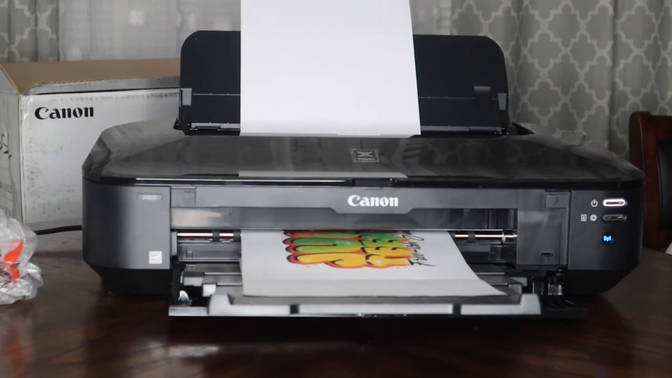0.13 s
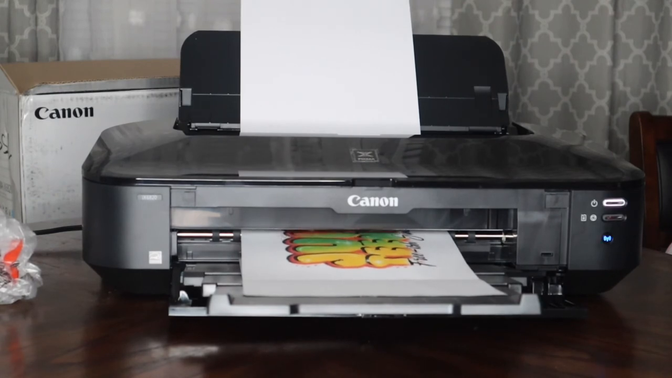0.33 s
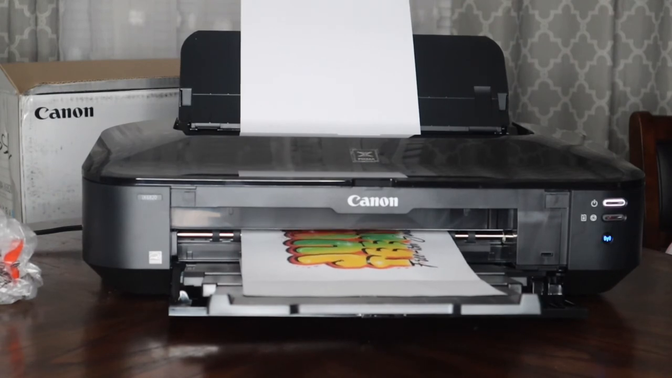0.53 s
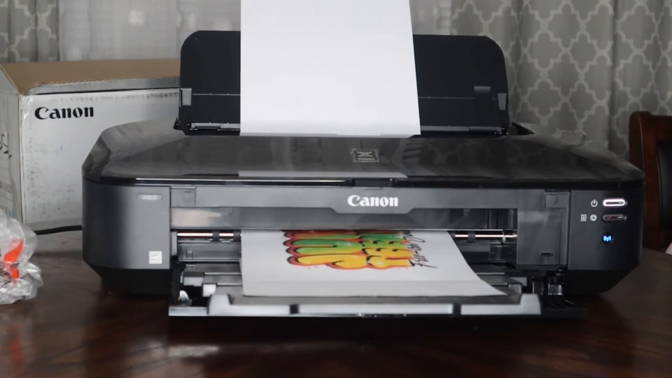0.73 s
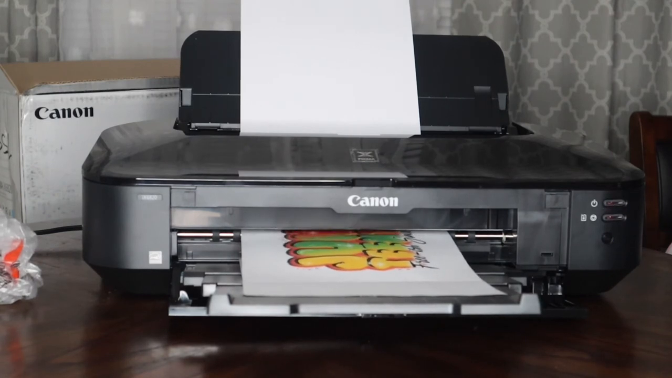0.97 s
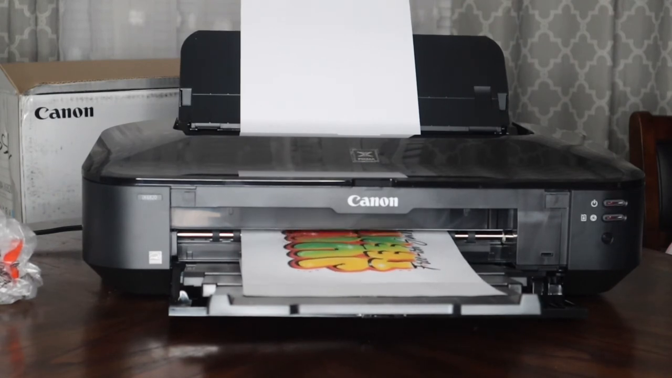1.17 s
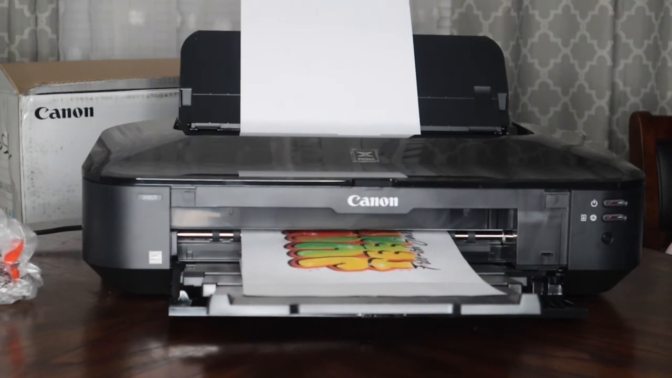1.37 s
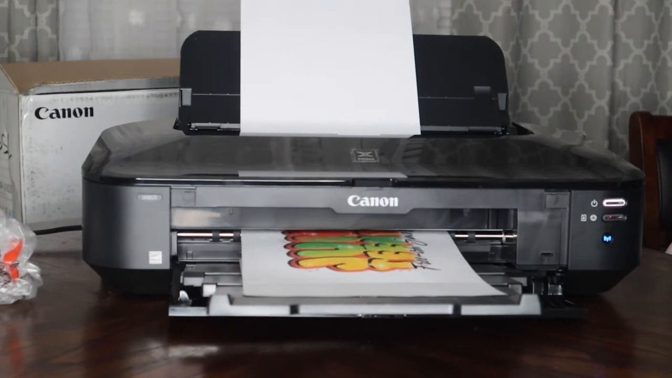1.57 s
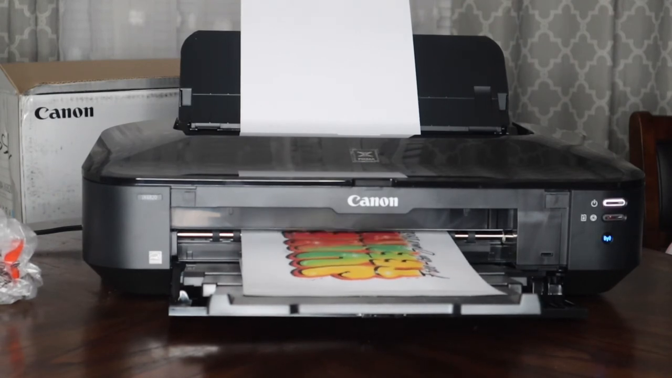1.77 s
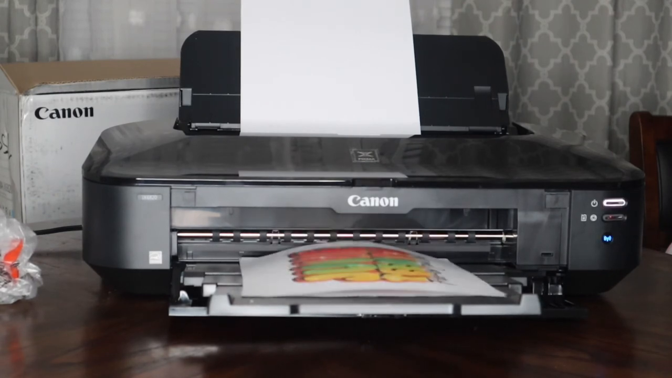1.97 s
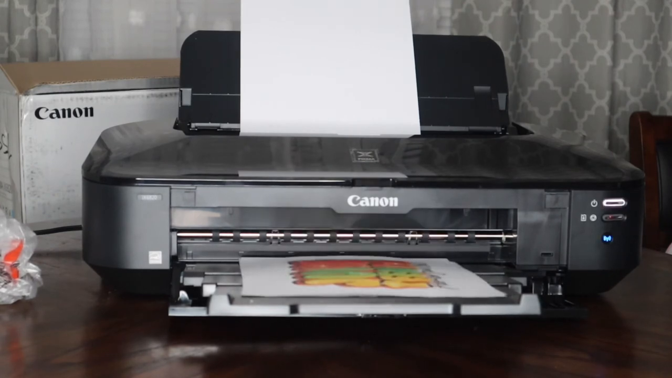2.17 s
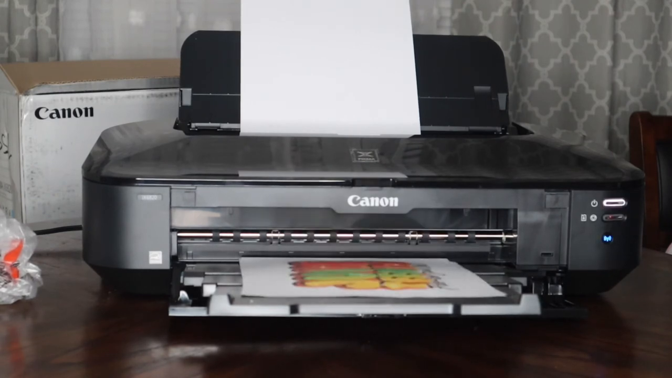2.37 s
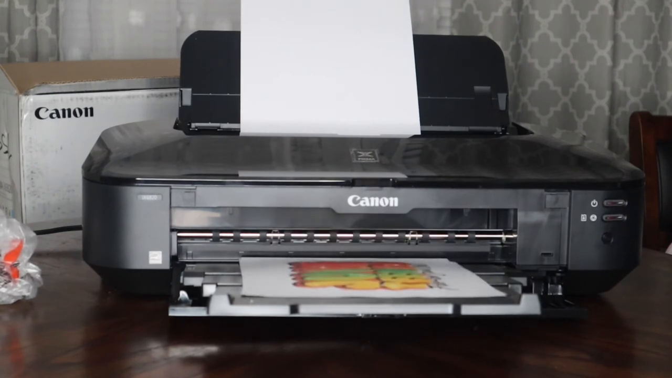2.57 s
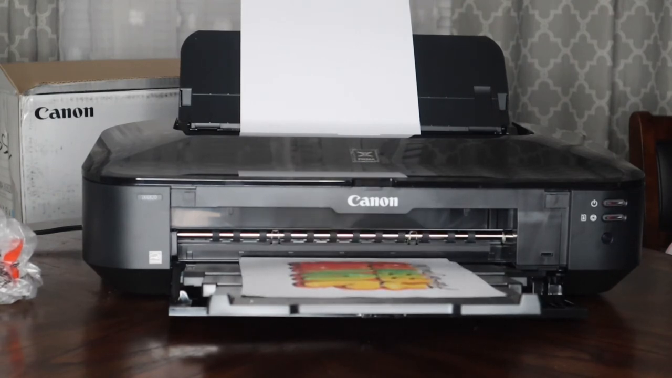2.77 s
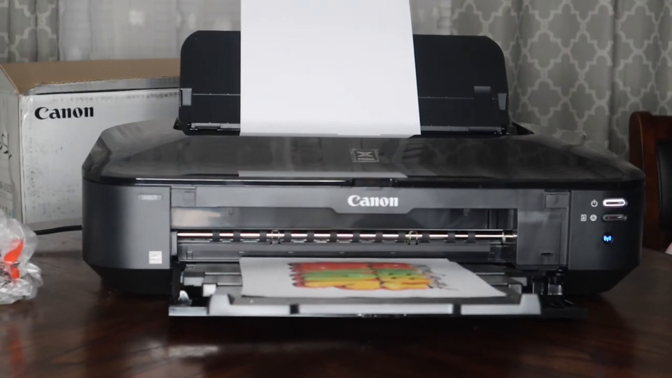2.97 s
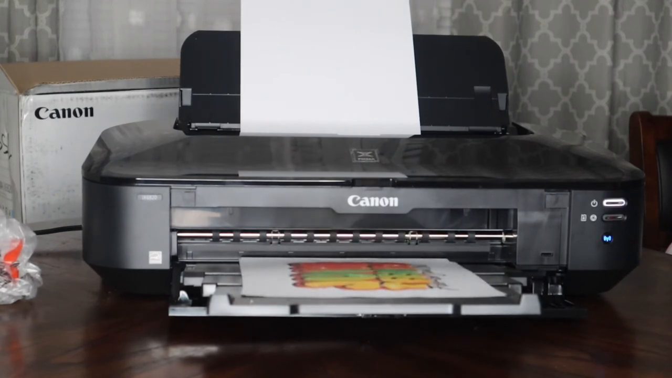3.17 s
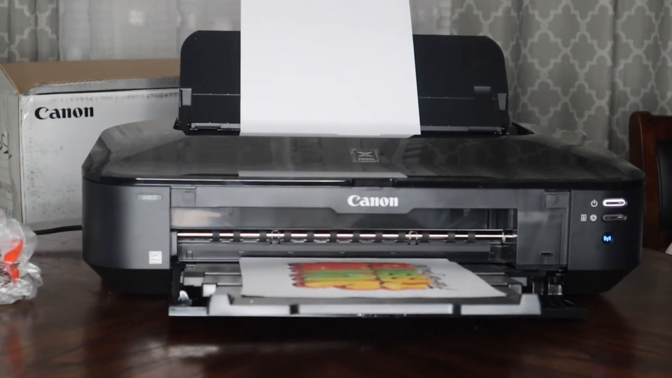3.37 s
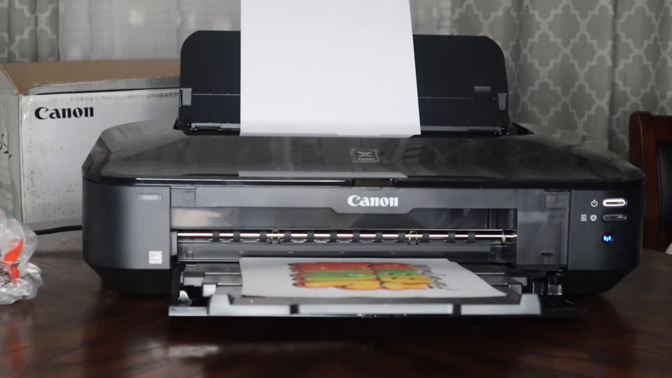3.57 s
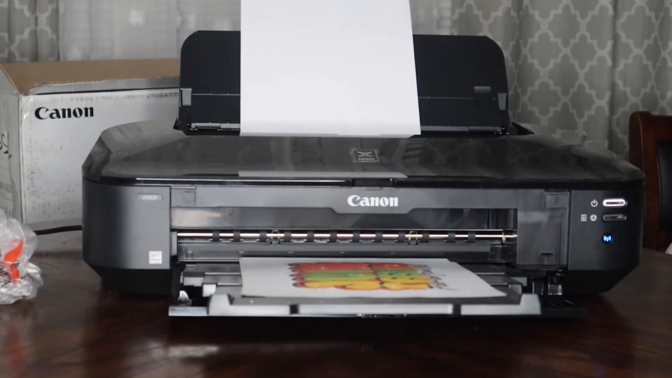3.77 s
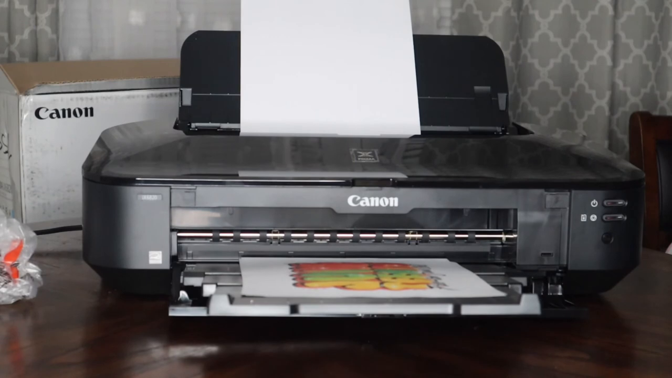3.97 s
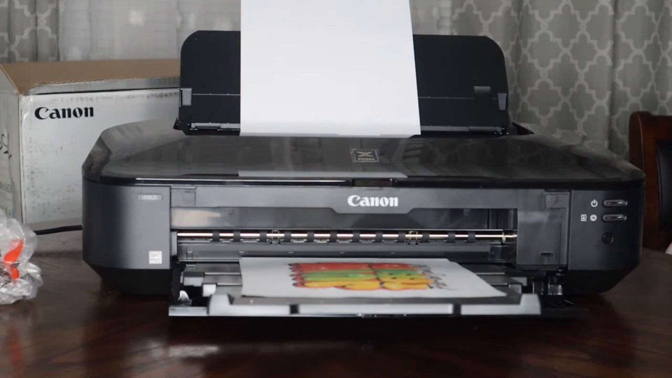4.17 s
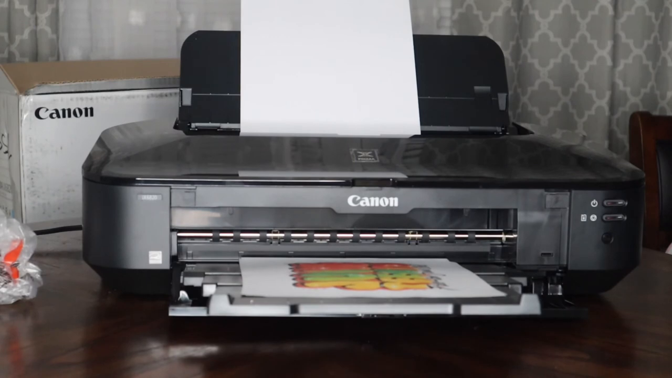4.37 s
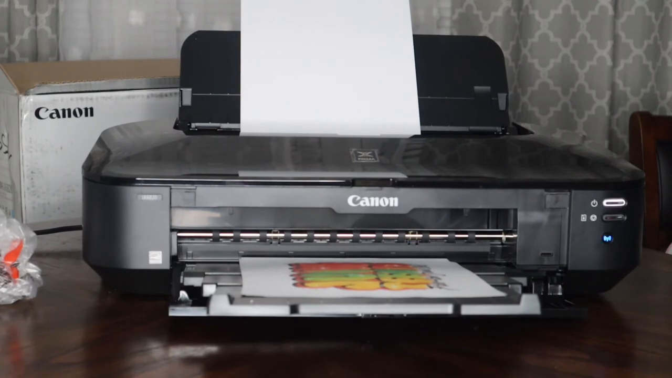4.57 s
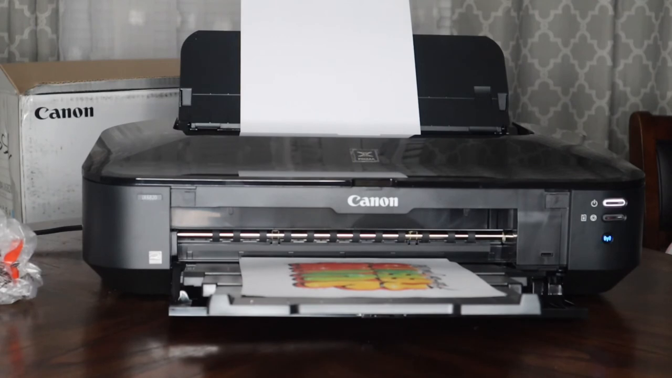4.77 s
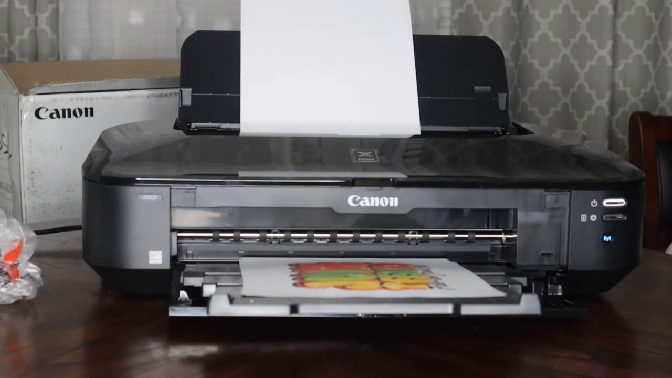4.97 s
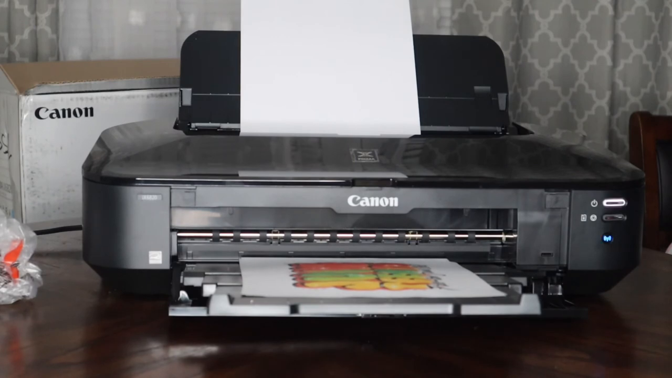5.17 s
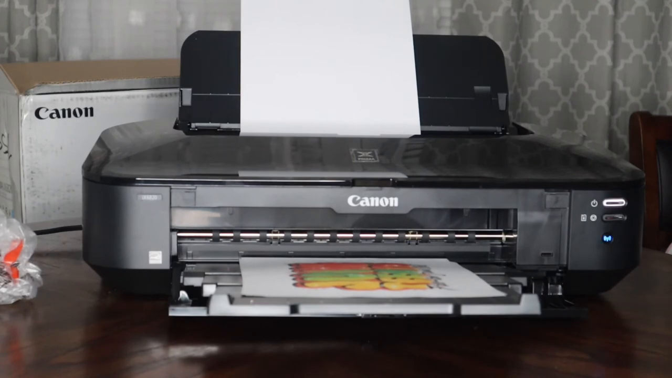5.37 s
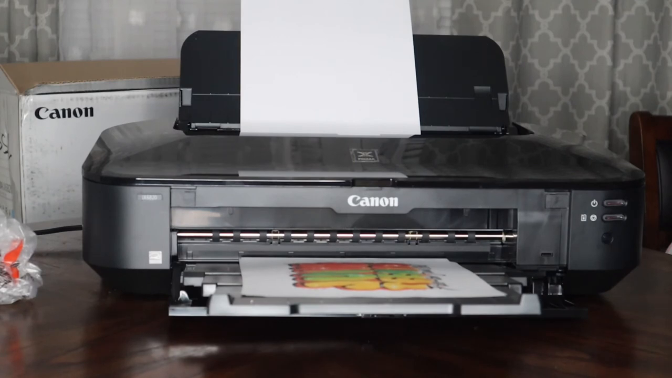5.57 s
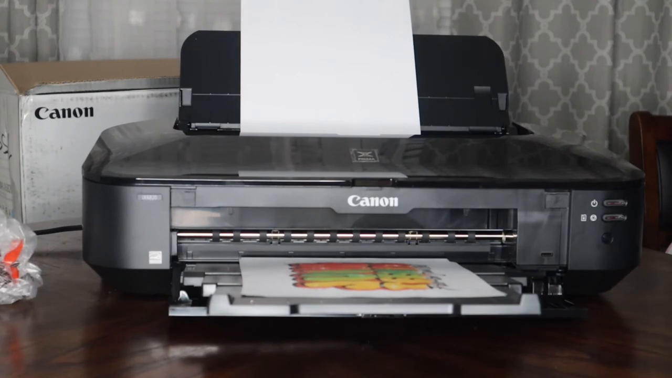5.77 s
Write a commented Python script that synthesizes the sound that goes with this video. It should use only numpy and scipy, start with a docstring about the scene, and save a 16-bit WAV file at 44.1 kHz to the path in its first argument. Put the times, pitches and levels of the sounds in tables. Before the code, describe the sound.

An inkjet printer shuttles its head with whirs and squeaks, races its gears to eject a sheet, slams loudly, then clicks into rest.

```python
"""An inkjet printer on a wooden table finishes a page in a small room.
The head shuttles (rail friction, belt drone, motor whine) while rollers nudge the paper on; some parts squeak.
Feed gears then race to throw out the sheet (mesh tones, tooth rattle, hiss), and the mechanism shifts with a clack.
A cam drive hums, flicks levers and trips its latch three times; the rollers spin once more.
A parking drive purrs and bumps; last, the head clicks into its rest. Blows are short noise bursts and ringing modes."""
import sys
import numpy as np
from scipy import signal
from scipy.fft import rfft, irfft, next_fast_len
from scipy.io import wavfile

SR = 44100
rng = np.random.default_rng(int(sys.argv[2]) if len(sys.argv) > 2 else 0)


def int16_out(signal):
    """Quantize to a 16-bit WAV file."""
    q = np.round(np.clip(np.atleast_2d(signal).T, -1, 1) * 32767)
    wavfile.write(sys.argv[1], SR, q.astype(np.int16))


N = 256220
TIME = np.arange(N) / SR


def from_db(db):
    """Decibels to gain."""
    return 10 ** (np.asarray(db) / 20)


def rms_one(x):
    """Scale to rms 1."""
    return x / np.sqrt(np.mean(x ** 2) + 1e-20)


def at_hz(points, hz):
    """Read a table on a log-frequency axis."""
    table_hz, value = np.transpose(points)
    return np.interp(np.log(hz + 1e-3), np.log(table_hz), value)


def peaks_db(peaks, hz):
    """Lift (or dip, if negative) of a set of resonances at these frequencies."""
    return sum(db / (1 + (2 * (hz - centre) / width) ** 2) for centre, width, db in peaks)


def drift(changes_per_s):
    """Random walk between independent knots, spread about 1."""
    knots = rng.standard_normal(4096)
    return np.interp(TIME * changes_per_s, np.arange(len(knots)), knots) * np.sqrt(3 / 2)


def since(s):
    """Seconds gone by since time s; zero before it."""
    return np.maximum(TIME - s, 0)


def swell(start_s, stop_s, ramp_s):
    """Rises after start and falls before stop."""
    return np.clip(np.minimum(TIME - start_s, stop_s - TIME) / ramp_s, 0, 1)


def envelope(start_s, stop_s, attack_s, release_db_per_s):
    """Rises from start, holds until stop and dies away."""
    return np.minimum(since(start_s) / attack_s, 1) * from_db(-release_db_per_s * since(stop_s))


def surge(peak_s, rise_db_per_s, fall_db_per_s):
    """Grows to a peak of 1 and dies away."""
    return from_db(-rise_db_per_s * np.maximum(peak_s - TIME, 0) - fall_db_per_s * since(peak_s))


# left-right likeness of the room: freq_hz, likeness
LIKENESS = [(30, 0.99), (60, 0.77), (250, 0.93), (500, 0.84), (1000, 0.4), (2000, 0.061), (4000, 0.21),
            (12000, 0.026)]
# place of a source: likeness table, lag_s of the right microphone
FRONT = (LIKENESS, 0.00009)


def radiate(force, spectrum, tilt_db=0, peaks=(), place=FRONT):
    """Rough contact under a force, coloured by a part and heard by two close microphones; rms 1."""
    size = len(force)
    likeness, lag_s = place
    padded = next_fast_len(size)
    hz = np.fft.rfftfreq(padded, 1 / SR)
    mid, side = rfft(rng.standard_normal((2, size)) * force, padded)
    alike = np.clip(at_hz(likeness, hz), -.99, .99)
    pair = np.sqrt(1 + alike) * mid + np.sqrt(1 - alike) * side * [[1], [-1]]
    pair[1] *= np.exp(-2j * np.pi * hz * lag_s)
    lowest_hz, highest_hz = spectrum[0][0], spectrum[-1][0]
    skirts = 1 / np.sqrt((1 + (lowest_hz / (hz + 1)) ** 8) * (1 + (hz / highest_hz) ** 8))
    colour_db = at_hz(spectrum, hz) + peaks_db(peaks, hz) + tilt_db * np.log2(hz + 1)
    return rms_one(irfft(pair * from_db(colour_db) * skirts, padded)[:, :size])


def rub(spectrum, grit_db, place=FRONT):
    """Friction: the contact force jumps from one asperity to the next."""
    return radiate(from_db(grit_db * drift(600)), spectrum, place=place)


def tone(hz, wobble, flutter_db):
    """A rotating part's tone with uneven speed (share) and load; rms 1."""
    phase = 2 * np.pi * np.cumsum(hz * (1 + wobble * drift(40))) / SR
    return rms_one(np.sin(phase) * from_db(flutter_db * drift(24.93)))


def add(out, s, sound):
    """Mix a sound in at time s."""
    start = round(s * SR)
    out[:, start:start + sound.shape[1]] += sound[:, :N - start]


# room decay: freq_hz, t60_s
ROOM_T60 = [(150, 0.86), (400, 0.64), (1000, 0.59), (3000, 0.56), (6000, 0.45), (12000, 0.27)]


def blows(rows, spectrum, attack_s, body_t60, room_db, peaks=(), place=FRONT):
    """Each blow sets off the dense, short modes of a plastic part; the room rings on, longest in the bass."""
    out, t = np.zeros((2, N)), TIME[:SR * 2 // 3]
    edges_hz = np.geomspace(250, 16000, 7)
    splits = [signal.butter(2, edge, fs=SR, output="sos") for edge in edges_hz]
    for s, level_db, tilt_db in rows:
        rest, tail = radiate(np.ones(len(t)), spectrum, tilt_db, peaks, place), 0
        body = rest * from_db(-60 * t / body_t60)
        # peel off bands from the bass up, each with its own room decay
        for edge, split in zip(edges_hz, splits):
            band = signal.sosfiltfilt(split, rest)
            rest = rest - band
            tail = tail + band * from_db(-60 * t / at_hz(ROOM_T60, edge / np.sqrt(2)))
        onset = 1 - np.exp(-t / attack_s)
        add(out, s, from_db(level_db) * onset * (body + from_db(room_db) * tail))
    return out


def ringing(rows, table, ring_db, tilt_share=0):
    """Long modes of a part; each answers every blow with its own strength, and may follow the blow's tilt."""
    out, t = np.zeros((2, N)), TIME[:SR]
    hz, mode_db, t60 = np.transpose(table)[:, :, None]
    modes = np.exp(2j * np.pi * hz * t) * from_db(mode_db - 60 * t / t60) * (1 - np.exp(-t / .002))
    spread = np.arccos(np.clip(at_hz(LIKENESS, hz[:, 0]), 0, 1)) / 2
    octaves = np.log2(hz[:, 0] / np.median(hz))
    for s, level_db, tilt_db in rows:
        chance_db = rng.normal(0, 1, len(hz))
        strength = from_db(level_db + ring_db + tilt_share * tilt_db * octaves + chance_db)
        # modes reach the two microphones out of step where likeness is low
        phase = rng.uniform(0, 2 * np.pi, len(hz)) + spread * [[1], [-1]]
        add(out, s, ((strength * np.exp(1j * phase)) @ modes).imag)
    return out


# air colour: freq_hz, density_db_per_hz
AIR = [(15, -39), (25, -1.5), (76, 1.5), (119, -3.5), (309, -9), (472, -6), (525, -12.5), (781, -12.5),
       (846, -13), (2140, -17), (2310, -18), (3440, -23.5), (14000, -64)]


def still_air():
    """Steady, mostly low noise of the room's air."""
    return from_db(-55) * radiate(np.ones(N), AIR)


# head cruising, once a pass: start_s, stop_s, whine_db
PASSES = [(0.118, 0.48, -55), (0.56, 0.833, -55.5), (0.942, 1.177, -55), (1.274, 1.49, -56)]
# carriage motor tones: pitch_hz, level_db (re whine)
WHINE = [(441, -2), (614, -5), (721, -3), (749, -2), (807, -2), (867, -5), (1296, -1.5), (1443, -11),
         (2428, -13), (2595, -16), (2902, -7), (3537, -14), (4233, -10)]
# rail rumble colour: freq_hz, density_db_per_hz
RAIL = [(59, -64), (100, -40), (112, -16), (190, -1.5), (256, -9), (321, 1.5), (386, -10.5), (433, -5),
        (609, -11.5), (810, -9), (1020, -15), (1210, -17), (1280, -17), (1540, -18.5), (3000, -22.5),
        (3900, -40), (6600, -120)]
# rail hiss colour: freq_hz, density_db_per_hz
RAIL_HISS = [(1180, -18), (2000, -7.5), (2800, -6.5), (3730, -4), (4200, -3), (5790, -8.5), (9360, -13.5),
             (11300, -11), (13700, -18), (15000, -35)]
PRINT_START_S, PRINT_STOP_S, PRINT_ATTACK_S, PRINT_RELEASE_DB_PER_S = 0.084, 1.57, 0.12, 21
# IDLE_DB: re full effort
RAIL_DB, BELT_DB, SLIDE_DB, CRUISE_HISS_DB, IDLE_DB = -44, -50.5, -54, -51, -12.5
WHINE_WOBBLE_SHARE, WHINE_FLUTTER_DB, WHINE_FADE_DB_PER_S = 0.007, 4, 15


def carriage():
    """The head slides on its rail and the belt drones; while it cruises the rail hisses more and the motor whines."""
    printing = envelope(PRINT_START_S, PRINT_STOP_S, PRINT_ATTACK_S, PRINT_RELEASE_DB_PER_S)
    effort = np.maximum(printing, from_db(IDLE_DB) * (TIME < PRINT_STOP_S))
    belt = tone(318, wobble=0.01, flutter_db=4.5) + from_db(-23) * tone(200, wobble=0.021, flutter_db=4.5)
    rumble = from_db(RAIL_DB) * rub(RAIL, grit_db=-1.0) + from_db(BELT_DB) * belt
    cruising, whine_level = np.zeros(N), np.zeros(N)
    for start_s, stop_s, whine_db in PASSES:
        cruise = swell(start_s, stop_s, ramp_s=0.042)
        cruising += cruise
        whine_level += cruise * from_db(whine_db - WHINE_FADE_DB_PER_S * since(start_s))
    hiss = np.hypot(from_db(SLIDE_DB) * effort, from_db(CRUISE_HISS_DB) * cruising)
    whine = sum(from_db(db) * tone(hz, WHINE_WOBBLE_SHARE, WHINE_FLUTTER_DB) for hz, db in WHINE)
    return effort * rumble + hiss * rub(RAIL_HISS, grit_db=0.5) + whine_level * whine


# head and belt ticks: start_s, level_db, tilt_db_per_octave
HEAD_TICKS = [(0.103, -49, -1.5), (0.466, -42, -0.5), (0.478, -38, -4), (0.551, -39.5, 3),
              (0.585, -41, -15), (0.804, -42, 0), (0.824, -45, -2), (1.145, -38.5, 1), (1.262, -40, -6),
              (1.468, -42.5, 0.5), (1.548, -40, -1.5), (1.612, -40, -1)]
# colour of head ticks and levers: freq_hz, density_db_per_hz
TICK_BODY = [(200, -14), (500, 8), (1000, 0), (1600, 0), (3000, -2), (4500, 0.5), (6500, -3.5),
             (11500, -13), (15000, -19)]
# tick resonances: centre_hz, width_hz, lift_db
TICK_PEAKS = [(2110, 230, 8.1), (3360, 120, 6.3), (4260, 380, 1.9)]


def head_ticks():
    """Head and belt tick at the turns: light, fast blows on plastic."""
    return blows(HEAD_TICKS, TICK_BODY, attack_s=0.00043, body_t60=0.05, room_db=-10.5, peaks=TICK_PEAKS)


# roller nudges between passes: start_s, stop_s, rumble_db, paper_hiss_db
NUDGES = [(0.427, 0.609, -39, -49), (0.579, 0.693, -41, -71), (0.797, 0.935, -38, -48),
          (1.126, 1.279, -38.5, -48)]
# roller colour: freq_hz, density_db_per_hz
ROLLERS = [(65, -44), (110, -43), (168, 5), (252, -7.5), (320, -10), (377, -1.5), (611, -7), (689, -17.5),
           (1100, -9.5), (1720, -21.5), (2130, -17.5), (3600, -30), (4000, -22.5), (5200, -28.5),
           (8800, -120)]
# paper hiss colour: freq_hz, density_db_per_hz
PAPER = [(2350, -5.5), (4000, -0.5), (4770, -3.5), (8080, -4.5), (11500, -6.5), (13700, -13), (14500, -31),
         (14700, -63), (15500, -78)]
# tone level re rumble
ROLLER_HZ, ROLLER_TONE_DB = 319, -0.5


def nudges():
    """Between passes the rollers turn a little, their gear sings, and they drag the sheet along."""
    gear = from_db(ROLLER_TONE_DB) * tone(ROLLER_HZ, wobble=0.0355, flutter_db=8.0)
    rollers = rub(ROLLERS, grit_db=1) + gear
    paper = rub(PAPER, grit_db=2.0)
    out = np.zeros((2, N))
    for start_s, stop_s, rumble_db, hiss_db in NUDGES:
        turn = swell(start_s, stop_s, ramp_s=0.058)
        out += turn * (from_db(rumble_db) * rollers + from_db(hiss_db) * paper)
    return out


# squeaks of rollers and head guide: start_s, pitch_hz, level_db
SQUEAKS = [(0.464, 4600, -42), (0.477, 4350, -42), (0.583, 4650, -40), (0.804, 3500, -46),
           (0.869, 4730, -48), (1.259, 4550, -44), (1.547, 4640, -45), (1.611, 3520, -43),
           (1.611, 6400, -48)]
SQUEAK_RISE_S, SQUEAK_FALL_DB_PER_S, SQUEAK_JITTER_SHARE = 0.004, 1100, 0.05


def squeaks():
    """Rollers and guide stick and slip: each squeak is a short tone of jittery pitch."""
    out, t = np.zeros((2, N)), TIME[:SR // 4]
    for s, hz, db in SQUEAKS:
        fall = from_db(-SQUEAK_FALL_DB_PER_S * np.maximum(t - SQUEAK_RISE_S, 0))
        shape = np.minimum(t / SQUEAK_RISE_S, 1) * fall
        jitter = SQUEAK_JITTER_SHARE * drift(1500)[:len(t)]
        phase = 2 * np.pi * np.cumsum(hz * (1 + jitter)) / SR
        add(out, s, from_db(db) * shape * np.sin(phase + [[0], [np.pi / 3]]))
    return out


HISS_ROOM_DB, HISS_ROOM_T60_S = -6, 0.5


def lingering(level, room_db, t60):
    """Level of a noise together with the reverberation that it builds up."""
    keep = from_db(-60 / (t60 * SR)) ** 2
    room_power = signal.lfilter([1 - keep], [1, -keep], level ** 2)
    return np.hypot(level, from_db(room_db) * np.sqrt(room_power))


# feed motor runs: start_s, spin_up_s, stop_s, top_speed_share, gear_db, hiss_db (paper and rollers)
FEED_RUNS = [(1.672, 0.042, 2.018, 0.99, -28.7, -38.7), (3.938, 0.058, 4.028, 0.84, -29.3, -40.3)]
GEAR_SAG_DB_PER_S, HISS_SAG_DB_PER_S = 2, 15
GEAR_RELEASE_DB_PER_S, HISS_RELEASE_DB_PER_S = 118, 320
# level grows with these powers of the spin-up
GEAR_POWER, HISS_POWER = 0.52, 2.04


def feed_motor():
    """Speed, gear level and hiss level: each run spins up, eases off and dies away."""
    speed, gear, hiss = np.zeros(N), np.zeros(N), np.zeros(N)
    for start_s, spin_up_s, stop_s, top_speed, gear_db, hiss_db in FEED_RUNS:
        run_s, coast_s = since(start_s), since(stop_s)
        spin = np.minimum(run_s / spin_up_s, 1)
        speed = np.where(TIME > start_s, spin * top_speed, speed)
        gear_now_db = gear_db - GEAR_SAG_DB_PER_S * run_s - GEAR_RELEASE_DB_PER_S * coast_s
        hiss_now_db = hiss_db - HISS_SAG_DB_PER_S * run_s - HISS_RELEASE_DB_PER_S * coast_s
        gear += spin ** GEAR_POWER * from_db(gear_now_db)
        hiss += spin ** HISS_POWER * from_db(hiss_now_db)
    return speed, gear, lingering(hiss, HISS_ROOM_DB, HISS_ROOM_T60_S)


# mesh tones at full speed: pitch_hz, level_db (relative), fade_db_per_s
MESH = [(562, -7.5, 0), (899, -8, 0), (1082, -14, 12), (1125, -17, 0), (1685, -19, 0), (2110, -21, 15),
        (2320, -16, 10), (2820, -17, 28), (3380, -21.5, 0), (3822, -27, 0)]
# gear frame resonances: centre_hz, width_hz, lift_db
GEAR_PEAKS = [(450, 30, 8.5), (485, 50, 1), (790, 44, 2), (990, 27, 6), (2450, 230, 5.5), (2910, 130, 7.5),
              (3560, 100, 3)]
MESH_SETTLE_S, MESH_COAST_S, MESH_WOBBLE_SHARE, MESH_FLUTTER_DB = 0.12, 0.07, 0.007, 3.8


def mesh_tones(pitch, load):
    """Meshing teeth sing through their frame; unloaded teeth hardly sing, the highest tones going first."""
    running_s, settled = np.zeros(N), np.zeros(N)
    for start_s, _, stop_s, *_ in FEED_RUNS:
        running_s = np.where(TIME > start_s, since(start_s), running_s)
        settled += swell(start_s, stop_s + MESH_COAST_S, MESH_SETTLE_S)
    out = np.zeros(N)
    for hz, db, fade_db_per_s in MESH:
        level = from_db(db - fade_db_per_s * running_s + peaks_db(GEAR_PEAKS, hz * pitch))
        out += level * load ** (hz / 2500) * tone(hz * pitch, MESH_WOBBLE_SHARE, MESH_FLUTTER_DB)
    return settled * out


# braking as the sheet leaves: time_s, pitch_share
FEED_BRAKING = [(1.98, 1), (2.05, 0.76), (2.12, 0.63), (3.9, 1)]
# gear frame colour: freq_hz, density_db_per_hz
GEARS = [(65, -49), (110, -25), (215, -4.5), (252, -18.5), (308, 3), (503, -8.5), (550, -3), (639, -2),
         (916, -3.5), (1200, -9), (1560, -13.5), (2640, -120)]
# tooth clatter colour: freq_hz, density_db_per_hz
TEETH = [(710, -39), (1200, -10), (1630, 0), (1920, -4), (2360, -4.5), (2910, -9), (3160, -16), (3900, -14),
         (5500, -31), (7150, -48), (12100, -120)]
FEED_HUNTING_SHARE, JUDDER_DB, JUDDER_PER_S = 0.005, 0.8, 220


def feed():
    """Meshing gears sing and rattle tooth by tooth; dull rollers come through at lower speed, paper hisses."""
    speed, gear, hiss = feed_motor()
    braking = np.interp(TIME, *np.transpose(FEED_BRAKING))
    pitch = speed * braking * (1 + FEED_HUNTING_SHARE * drift(14))
    judder = from_db(JUDDER_DB * drift(JUDDER_PER_S))
    tooth_phase = 2 * np.pi * np.cumsum(MESH[0][0] * pitch) / SR
    teeth = (1 + .9 * np.cos(tooth_phase)) * from_db(1.8 * drift(500)) * judder
    rattle = from_db(1.5) * radiate(teeth, GEARS, peaks=GEAR_PEAKS)
    load = np.clip(hiss / (gear + 1e-9) * from_db(15), 0, 1)
    mesh = from_db(0.5) * mesh_tones(pitch, load)
    rollers = from_db(-6.0) * np.sqrt(1 - speed ** 2) * rub(ROLLERS, grit_db=1.5)
    # clatter needs speed and load, so it dies with the hiss
    clatter_level = from_db(2.5) * speed ** 3 * np.sqrt(gear * hiss)
    clatter = clatter_level * radiate(teeth, TEETH, peaks=GEAR_PEAKS)
    paper = hiss * from_db(4.0) * rub(PAPER, grit_db=1.0)
    return gear * (speed * (rattle + mesh) + rollers) + clatter + paper


# feed gears taking up slack: start_s, level_db, tilt_db_per_octave
JOLTS = [(1.686, -41, -5), (1.701, -28, 0), (1.733, -33, -2), (2.03, -38, -4), (3.946, -42, -6),
         (3.975, -42, -1), (4.006, -36, 3), (4.028, -38, 1)]
# roller frame modes: pitch_hz, level_db (relative), t60_s
JOLT_MODES = [(182, 3, 0.09), (425, -6, 0.25), (755, -5, 0.5)]


def jolts():
    """Feed gears take up their slack as they start and stop, and ring the roller frame."""
    knocks = blows(JOLTS, GEARS, attack_s=0.002, body_t60=0.05, room_db=-16)
    return knocks + ringing(JOLTS, JOLT_MODES, ring_db=2, tilt_share=0.7)


# cam motor surges (the first is the low rumble that follows the gear shift's slam): peak_s, rumble_db,
# gear_tone_db
CAM_STEPS = [(2.27, -35, -59), (2.41, -62, -44.5), (2.78, -46, -45.5), (3.03, -53, -43), (3.125, -46, -44),
             (3.28, -50, -46.5), (3.5, -45, -46), (3.64, -44.5, -48)]
# spring windings: peak_s, hum_db
WINDINGS = [(2.4, -39), (2.64, -48), (3.019, -38.5), (3.48, -47)]
# cam drive colour: freq_hz, density_db_per_hz
CAM_BODY = [(53, -63), (90, -35), (126, -7), (201, 2), (259, -8.5), (313, 2.5), (542, -21), (589, -9.5),
            (938, -15), (2180, -18.5), (2530, -26), (3330, -22), (6280, -29), (11800, -39.5), (14000, -42)]
CAM_START_S, CAM_STOP_S, CAM_DB, CAM_SAG_DB_PER_S, CAM_RELEASE_DB_PER_S = 2.08, 4.04, -44.5, 2, 31
STEP_RISE_DB_PER_S, STEP_FALL_DB_PER_S = 305, 174
CAM_HZ, HUM_RISE_DB_PER_S, HUM_FALL_DB_PER_S, WINDING_S = 150.6, 37, 151, 0.22


def cam():
    """The cam drive rumbles, surges at each step, and hums ever louder as it winds its spring until it slips over."""
    running = envelope(CAM_START_S, CAM_STOP_S, attack_s=0.066, release_db_per_s=CAM_RELEASE_DB_PER_S)
    rumble = running * from_db(CAM_DB - CAM_SAG_DB_PER_S * since(CAM_START_S))
    gear = from_db(-18.5) * rumble
    for peak_s, rumble_db, gear_db in CAM_STEPS:
        step = surge(peak_s, STEP_RISE_DB_PER_S, STEP_FALL_DB_PER_S)
        rumble = np.hypot(rumble, from_db(rumble_db) * step)
        gear = np.hypot(gear, from_db(gear_db) * step)
    hum = np.zeros(N)
    for peak_s, hum_db in WINDINGS:
        onset = np.minimum(since(peak_s - WINDING_S) / 0.1, 1)
        hum += from_db(hum_db) * surge(peak_s, HUM_RISE_DB_PER_S, HUM_FALL_DB_PER_S) * onset
    friction = from_db(-1) * rumble * rub(CAM_BODY, grit_db=1.0)
    gear_tone = gear * tone(322, wobble=0.0267, flutter_db=4.5)
    return friction + gear_tone + hum * tone(CAM_HZ, wobble=0.0125, flutter_db=0.0)


# gear shift slamming home, then rattling to rest: start_s, level_db, tilt_db_per_octave
SLAM = [(2.1305, -17, -5), (2.1352, -12, -5), (2.1395, -10, 1.5), (2.1485, -20, 2), (2.1585, -11.5, -6),
        (2.168, -24, -5), (2.179, -21, 0), (2.193, -19, -3.5), (2.226, -23, -1.5), (2.267, -29, -3),
        (2.297, -33, -0.5)]
# slam colour: freq_hz, density_db_per_hz
SLAM_BODY = [(65, -64), (110, -41), (192, -22), (261, -23.5), (327, -10), (619, -4.5), (1300, 3.5),
             (1630, -3), (2000, 1), (2410, -2), (3780, -7), (6590, -18), (11000, -21), (12700, -20),
             (15000, -98)]
# slam resonances and hollows: centre_hz, width_hz, lift_db
SLAM_PEAKS = [(520, 27, -4.5), (1380, 40, -9), (2020, 740, 5), (2330, 120, -12), (2710, 62, -11),
              (3070, 220, 5), (3380, 140, -0.5), (3950, 280, 8), (4200, 70, -11), (4300, 110, 10),
              (4350, 80, -8)]
# plastic casing modes: pitch_hz, level_db (relative), t60_s
CASING = [(210, -17, 0.6), (328, -12, 0.7), (432, -12.5, 0.6), (554, -15, 0.45), (684, -16, 0.55),
          (775, -11, 0.4), (896, -12, 0.4), (958, -13, 0.4), (996, -19, 0.8), (1017, -8, 0.36),
          (1090, -10, 0.35), (1132, -14, 0.35), (1265, -10, 0.28), (1286, -8, 0.28), (1696, -17, 0.36),
          (1757, -11, 0.44), (1782, -19, 0.36), (1865, -17, 0.43), (1947, -13, 0.55), (2030, -17, 0.45),
          (2115, -14, 0.3), (2422, -20, 0.45), (2560, -20, 0.45), (2821, -23, 0.42), (3112, -19, 0.33),
          (3195, -15.5, 0.38), (3607, -25, 0.45), (3790, -19, 0.3), (3890, -23, 0.32), (4000, -22, 0.4),
          (4260, -25, 0.33), (4600, -29, 0.4), (4890, -28, 0.42)]


def gear_shift():
    """The shift strikes the plastic frame; its second blow rings the whole casing."""
    slam = blows(SLAM, SLAM_BODY, attack_s=0.00087, body_t60=0.037, room_db=-12.0, peaks=SLAM_PEAKS)
    return slam + ringing(SLAM[1:2], CASING, ring_db=-3.0)


# latch trips: start_s, level_db
TRIPS = [(2.4987, -29.5), (2.8441, -28.5), (3.3586, -30.5)]
# snap, thud and bounce of a trip: delay_s, level_db (re trip), tilt_db_per_octave
TRIP_CONTACTS = [(0, -1, 4), (0.0114, 0, -3.5), (0.039, -8, -1.5)]
# latch colour: freq_hz, density_db_per_hz
LATCH_BODY = [(65, -48), (110, -32), (204, -5.5), (378, -14), (445, -5), (504, -13), (973, -4.5),
              (1350, -16.5), (1880, -12.5), (2260, -18), (2460, -12.5), (4370, -29), (5480, -36),
              (12200, -51.5), (15000, -99)]
# latch resonances: centre_hz, width_hz, lift_db
LATCH_PEAKS = [(2800, 490, -3), (4340, 240, 8.5)]
# long latch modes: pitch_hz, level_db (relative), t60_s
LATCH_MODES = [(211, -13, 0.45), (315, -15, 0.45), (440, -12, 0.5), (698, -13, 0.35), (864, -10, 0.37),
               (965, -8, 0.43), (1950, -17, 0.6), (2900, -26, 0.17)]
# short, bright catch modes: pitch_hz, level_db (relative), t60_s
CATCH_MODES = [(2094, -5, 0.1), (2428, -3, 0.1), (2570, -4, 0.07), (2700, -2, 0.07), (2960, -2, 0.09),
               (3200, -3, 0.1), (3795, -2, 0.07), (4270, -2, 0.08), (4400, -6, 0.05)]


def latch():
    """The cam trips the latch: snap, thud and bounce ring it; the snap alone rings its catch."""
    contacts = [(s + delay_s, db + contact_db, tilt_db)
                for s, db in TRIPS for delay_s, contact_db, tilt_db in TRIP_CONTACTS]
    snaps = contacts[::len(TRIP_CONTACTS)]
    knocks = blows(contacts, LATCH_BODY, attack_s=0.0016, body_t60=0.048, room_db=-6, peaks=LATCH_PEAKS)
    ring = ringing(contacts, LATCH_MODES, ring_db=-3.0)
    return knocks + ring + ringing(snaps, CATCH_MODES, ring_db=-5.0)


# levers flicked by the cam: start_s, level_db, tilt_db_per_octave
TICKS = [(2.586, -48.5, 1.5), (2.723, -45, -2.5), (2.752, -38, -1), (2.814, -45, -0.5), (2.946, -40, 1),
         (2.958, -53, 10), (2.968, -50, -9), (3.079, -37, -1), (3.096, -43.5, -2.5), (3.184, -44.5, 0),
         (3.258, -46.5, -1), (3.475, -43, -3), (3.601, -37.5, -2.5), (3.62, -44.5, -0.5)]


def levers():
    """Small levers flicked by the cam strike the plastic frame."""
    return blows(TICKS, TICK_BODY, attack_s=0.0016, body_t60=0.053, room_db=-6.5)


# parking drive colour: freq_hz, density_db_per_hz
PARKING_BODY = [(110, -13), (150, -9.5), (250, -2), (400, -7.5), (700, -9.5), (1200, -12.5), (2300, -19),
                (4500, -21.5), (8000, -30.5), (12000, -33), (15000, -36)]
# parking drive hum: pitch_hz, level_db (re purr)
PARKING_HUM = [(56, -5.5), (145, -5), (242, -10.5)]
# out-of-step place, left and right largely opposed: (freq_hz, likeness), lag_s
OUT_OF_STEP = ([(60, 0.88), (200, -0.51), (400, -0.61), (1300, -0.85), (2500, -0.8), (12000, -0.71)], 0)
PARKING_START_S, PARKING_ATTACK_S, PARKING_DB = 3.73, 0.88, -55.5


def parking_drive():
    """A slow drive gets going gradually, then purrs evenly with a wavering hum, heard largely out of step in
    the two microphones."""
    purr = from_db(PARKING_DB) * np.minimum(since(PARKING_START_S) / PARKING_ATTACK_S, 1)
    hum = sum(from_db(db) * tone(hz, wobble=0.0397, flutter_db=3.5) for hz, db in PARKING_HUM)
    return purr * (from_db(4.5) * rub(PARKING_BODY, grit_db=0.5, place=OUT_OF_STEP) + hum)


# head rest place: (freq_hz, likeness), lag_s
HEAD_REST = ([(60, 1), (300, 0.5), (700, 0.5), (1200, 0.3), (2200, -0.1), (4000, -0.62), (12000, -0.62)], 0)
# parking drive bumps: start_s, level_db, tilt_db_per_octave
BUMPS = [(4.758, -43, -3), (4.793, -51.5, 0), (4.817, -57, 6), (4.997, -51, -1), (5.019, -52.5, -3),
         (5.215, -53, 5), (5.233, -54.5, 7), (5.258, -54, 6)]
# bump colour: freq_hz, density_db_per_hz
BUMP_BODY = [(200, -21), (400, -6), (650, 11.5), (900, 1), (1500, -3), (2500, -11), (5000, -40),
             (12000, -70)]


def parking_bumps():
    """The parking drive bumps softly: dull blows with a gentle onset."""
    return blows(BUMPS, BUMP_BODY, attack_s=0.0015, body_t60=0.07, room_db=-10, place=HEAD_REST)


# head locking in its rest: start_s, level_db, tilt_db_per_octave
LOCK = [(5.464, -48, 7), (5.4915, -33, 8.5), (5.4945, -40, -0.5), (5.4995, -36, 8), (5.503, -48, 0),
        (5.524, -36.5, 10.5)]
# crack of the dropping pawl: start_s, level_db, tilt_db_per_octave
LOCK_CRACK = [(5.4915, -26.5, 6)]
# lock colour: freq_hz, density_db_per_hz
LOCK_BODY = [(250, -6), (450, 8), (1000, 6.5), (1350, 7.5), (1800, 7), (2700, 7.5), (3100, -0.5),
             (4500, -6), (6300, -15), (7500, -10.5), (11500, -13.5), (13000, -24), (15000, -35)]
# lock resonances and hollows: centre_hz, width_hz, lift_db
LOCK_PEAKS = [(2200, 900, 1), (3000, 150, -4), (5000, 400, 4), (7000, 500, 5), (7600, 500, -4),
              (8170, 300, 6), (8800, 600, -5)]


def head_lock():
    """The head locks in its rest with bright, short blows; the pawl drops with a sharp, nearly dry crack."""
    lock = blows(LOCK, LOCK_BODY, attack_s=0.00017, body_t60=0.017, room_db=-7.5,
                 peaks=LOCK_PEAKS, place=HEAD_REST)
    return lock + blows(LOCK_CRACK, LOCK_BODY, attack_s=0.00005, body_t60=0.006, room_db=-40)


def scene():
    """The printer over the still air of the room."""
    printing = carriage() + head_ticks() + nudges() + squeaks()
    ejecting = feed() + jolts()
    shifting = cam() + gear_shift() + latch() + levers()
    parking = parking_drive() + parking_bumps() + head_lock()
    return still_air() + printing + ejecting + shifting + parking


CUTOFF_HZ = 15200


def record(dry):
    """The microphone rolls off above 13.2 kHz; a steep cut follows."""
    dull = signal.sosfilt(signal.butter(8, 13200, fs=SR, output="sos"), dry)
    return signal.sosfilt(signal.ellip(10, .1, 90, CUTOFF_HZ, fs=SR, output="sos"), dull)


dry = scene()
out = record(dry)
int16_out(out)
```